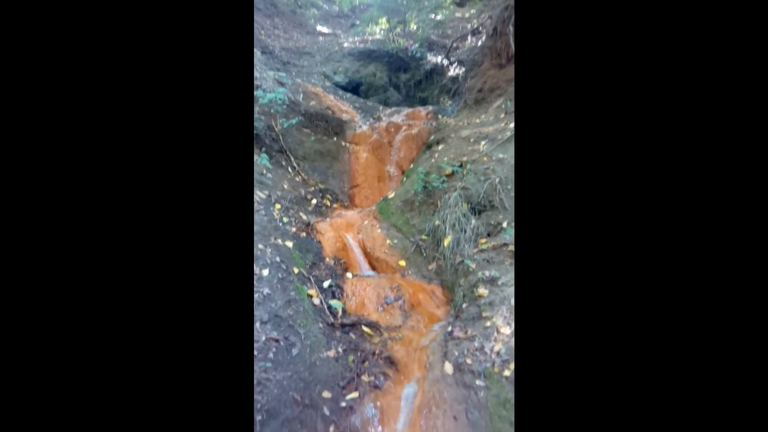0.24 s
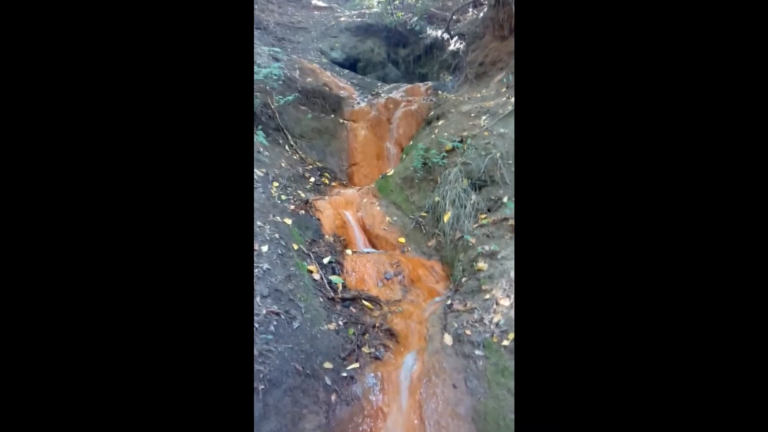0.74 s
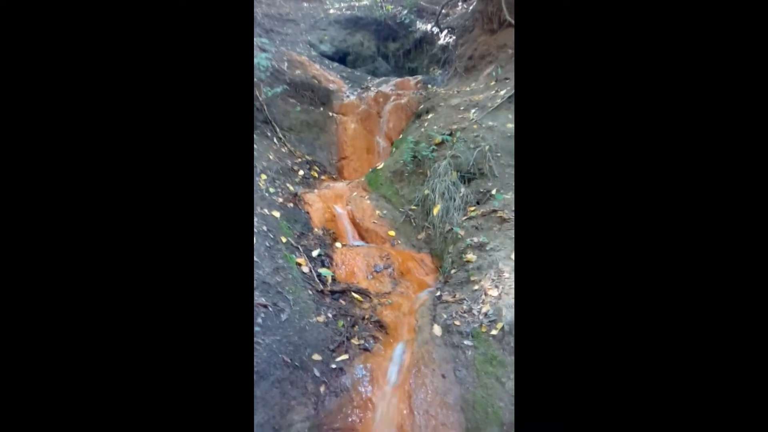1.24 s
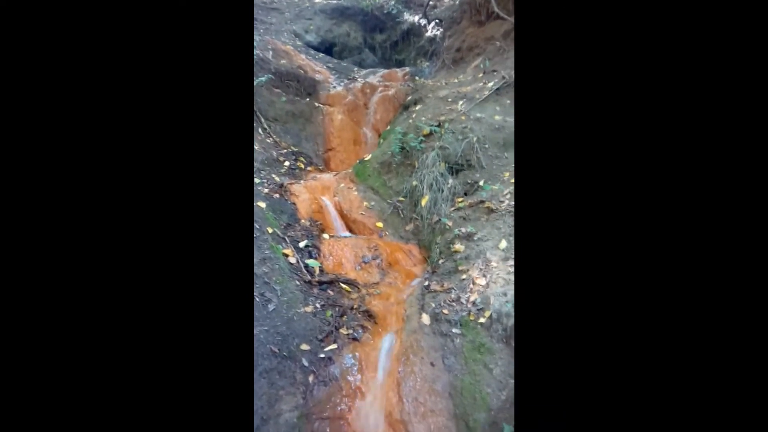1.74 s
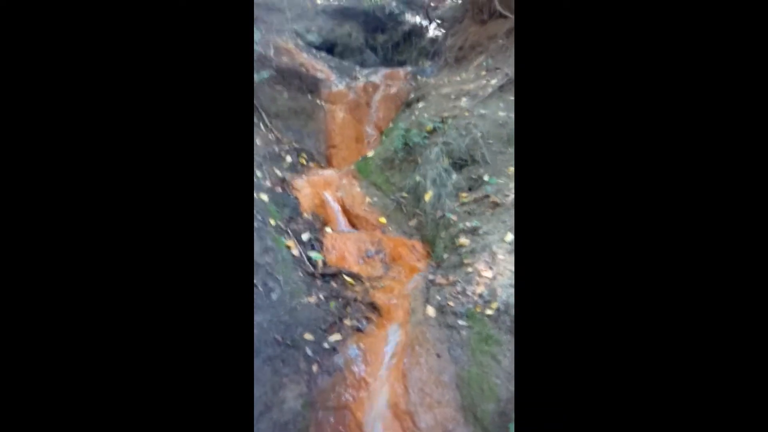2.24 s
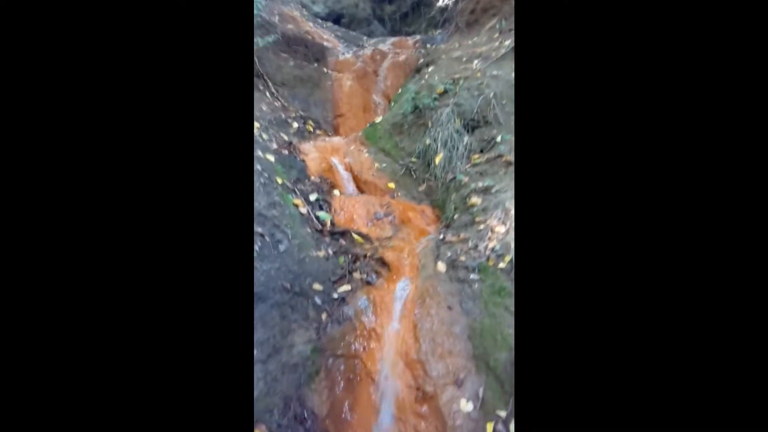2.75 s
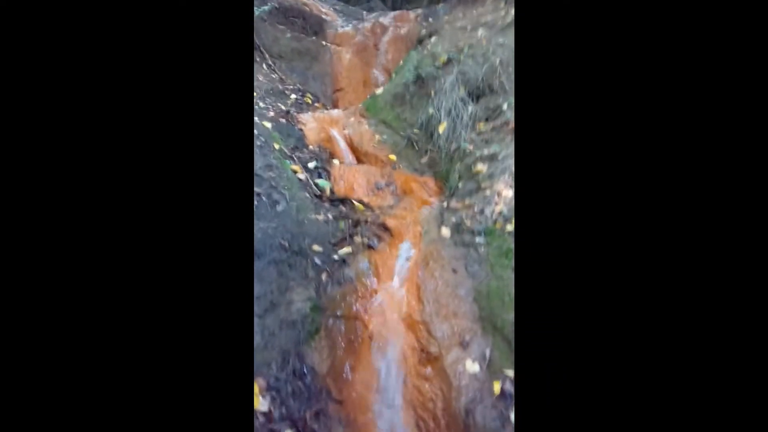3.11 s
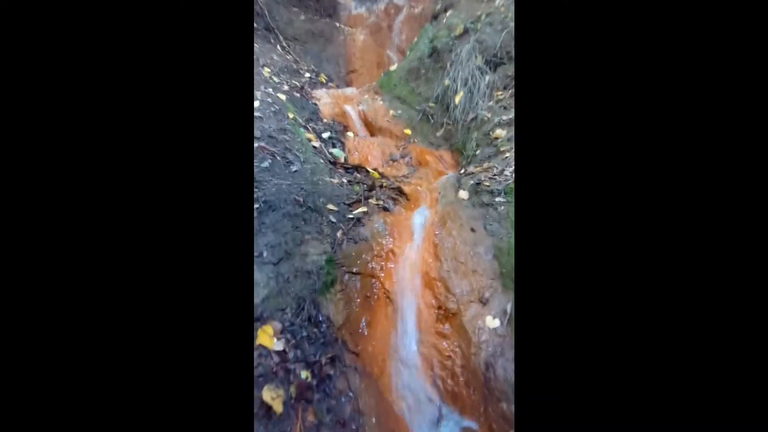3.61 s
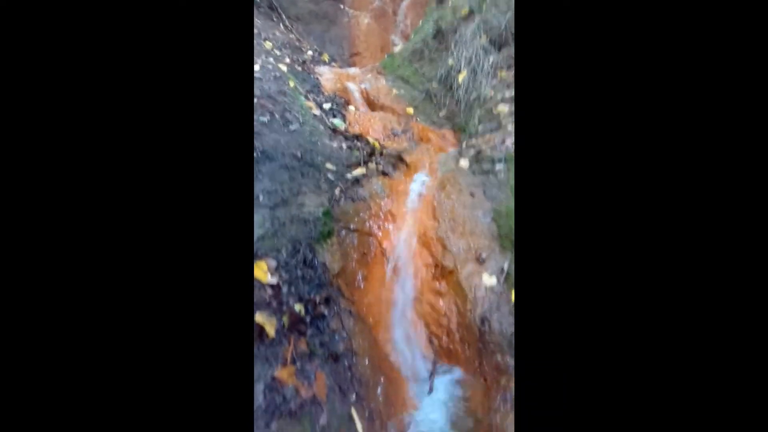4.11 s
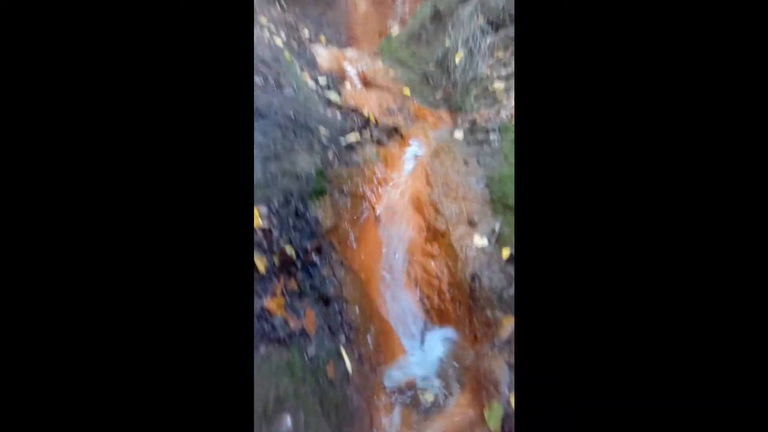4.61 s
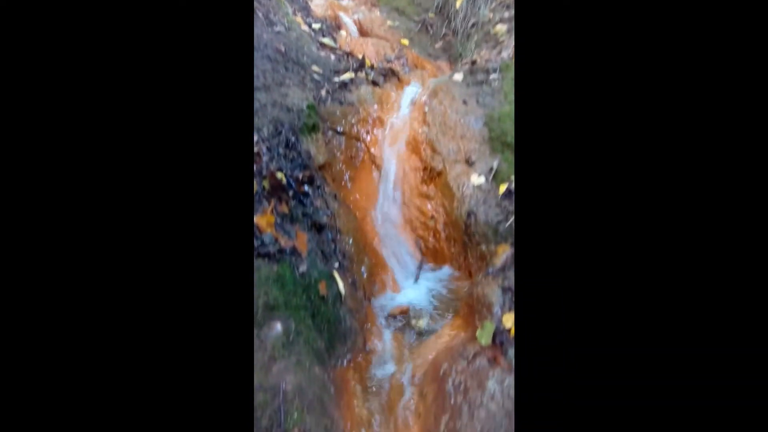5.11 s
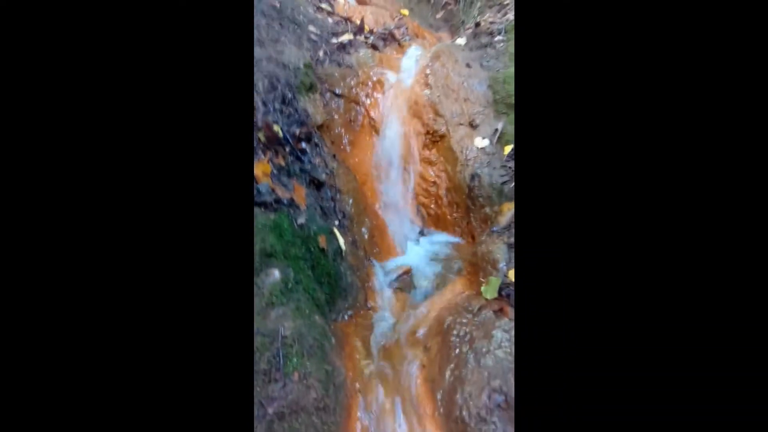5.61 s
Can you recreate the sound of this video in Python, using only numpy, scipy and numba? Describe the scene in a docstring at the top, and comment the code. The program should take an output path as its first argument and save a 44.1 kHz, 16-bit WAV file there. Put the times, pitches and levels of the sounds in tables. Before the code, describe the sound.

Steady outdoor rush of shallow running water, tinkling and fizzing at first, turning louder with bubbling gurgles and sharp drips on stone.

```python
"""Spring water runs down a narrow rocky channel, heard in mono from a microphone carried slowly towards it.
Swarms of bubbles, each a short dying sine, make everything from deep gulps to fine tinkling and fizz.
Rivulets trill with like-sized bubbles; drops slap and tick as bursts of noise and clicks on the stone.
Filters colour the water like hollows in the rock, and the earth banks add a short tail of echoes.
About three seconds in, the lower chute and its plunge pool come close and the gurgling grows."""
import sys
import numpy as np
from scipy import signal
from scipy.fft import rfft, irfft
from scipy.io import wavfile
from scipy.ndimage import uniform_filter1d, map_coordinates
from numba import njit

SR = 44100
rng = np.random.default_rng(int(sys.argv[2]) if len(sys.argv) > 2 else 0)


def file_out(sig):
    """Save sig as 16-bit WAV at sys.argv[1]."""
    # one column per channel
    cols = np.atleast_2d(sig).T
    # limit, then scale
    lim = np.clip(cols, -1, 1)
    pcm = np.round(lim * 32767).astype(np.int16)
    wavfile.write(sys.argv[1], SR, pcm)


N = 258426
TIME = np.arange(N) / SR  # s
BLOOM = 0.012  # swelling time constant of a bubble, as a share of its ring time
REF_HZ, DAMPING = 1000, 0.63  # lone and rivulet bubbles: ring time falls as this power of pitch / REF_HZ


@njit
def ring(start, hz, size, t60, rise, bloom):
    """Each bubble is a sine that swells as it pinches off, then dies while its pitch climbs towards the surface."""
    out = np.zeros(N)
    for k in range(len(start)):
        first = int(start[k] * SR)
        length = t60[k] * SR
        phase = 0.
        gain = size[k] * (1 + 10 * bloom)  # a little extra height for the slow start
        fall = np.exp(-np.log(1000.) / length)  # 60 dB over the ring time
        neck = 1.
        pinch = np.exp(-1 / (bloom * length))
        for i in range(max(first, 0), min(first + int(length), N)):
            climb = 1 + rise[k] * (i - first) / length
            phase += 2 * np.pi * hz[k] * climb / SR
            gain *= fall
            neck *= pinch
            out[i] += gain * (1 - neck) * np.sin(phase)
    return out


def bubbles(per_s, lo_hz, hi_hz, cycles, spread_db, rise, drift=None):
    """A swarm of bubbles of mixed radius, rms 1: small ones ring high, and a positive spread makes few strong."""
    when, radius, force, damping, depth = rng.random((int(per_s * N / SR), 5)).T
    hz = lo_hz * (hi_hz / lo_hz) ** radius
    if drift is not None:
        hz = hz * drift[(when * N).astype(int)]
    strength_db = -spread_db * np.log(force + .01)
    # small bubbles die sooner, so they need more height for the same power per Hz
    size = undb(strength_db) * hz
    t60 = cycles * 2 ** (2 * damping - 1) / hz  # from half to twice the given cycles
    swarm = ring(when * N / SR, hz, size, t60, 2 * rise * depth, BLOOM)
    return swarm / swarm.std()


def impacts(per_s, spread_db):
    """Droplets hit stone, one click each; rms 1."""
    when, force = rng.random((int(per_s * N / SR), 2)).T
    strength_db = -spread_db * np.log(force + .01)
    signs = (-1) ** np.arange(len(when))
    clicks = np.bincount((when * N).astype(int), undb(strength_db) * signs, N)
    return clicks / clicks.std()


def water(ringing, drops_per_s, lo_hz, hi_hz, splash_db):
    """Bubbles and the fainter clicks of their drops come in splashes and ring the rock; slow level at rms 1."""
    grains = ringing + undb(-12) * impacts(drops_per_s, spread_db=4.0)
    return steady(band(channel(grains * undb(splash_db)), lo_hz, hi_hz, order=3))


def gulps(surge):
    """Big pockets of air are dragged under in the pool, with the soft thud of falling water."""
    ringing = bubbles(per_s=260, lo_hz=183, hi_hz=583, cycles=14.2, spread_db=2.0, rise=0.18)
    splash_db = 0.53 * surge + 1.3 * walk(20)
    return water(ringing, drops_per_s=830, lo_hz=27, hi_hz=710, splash_db=splash_db)


def gurgle(surge):
    """Pea-sized bubbles churn at the foot of the chute."""
    ringing = bubbles(per_s=280, lo_hz=594.4, hi_hz=1118.5, cycles=46, spread_db=0.8, rise=0.11)
    splash_db = 1.0 * surge + 1.0 * walk(35)
    return water(ringing, drops_per_s=1000, lo_hz=480, hi_hz=1250, splash_db=splash_db)


def burble(surge):
    """The chute folds air into a dense, steady run of bubbles."""
    ringing = bubbles(per_s=800, lo_hz=1114, hi_hz=1621, cycles=38, spread_db=2.0, rise=0.05)
    splash_db = 0.54 * surge + 0.59 * walk(45)
    return water(ringing, drops_per_s=1900, lo_hz=995, hi_hz=1720, splash_db=splash_db)


def babble(surge):
    """Smaller bubbles form where the stream folds over the steps; one ledge sheds bubbles of like size."""
    ringing = bubbles(per_s=650, lo_hz=1649, hi_hz=3044, cycles=71, spread_db=1.5, rise=0.068)
    ledge_drift = np.exp(0.04 * walk(4))
    ledge = bubbles(per_s=400, lo_hz=1816, hi_hz=2100, cycles=24, spread_db=-2.0, rise=0.04, drift=ledge_drift)
    ledge_db = -6.5 + 4.3 * walk(16)
    splash_db = 0.67 * surge + 1.07 * walk(45)
    return water(ringing + undb(ledge_db) * ledge, drops_per_s=2000, lo_hz=1350, hi_hz=2920, splash_db=splash_db)


# A thin jet sheds bubbles of nearly one size, drifting with the flow; only pitch relative to its mean is used:
# (time [s], pitch [Hz])
JET_PITCH = [(0, 4260), (.8, 4040), (1.05, 4400), (1.5, 3920), (2.1, 4260), (3.05, 4320), (3.4, 4780),
             (3.8, 4090), (5.86, 4410)]


def tinkle(surge):
    """Drops trap tiny bubbles in the thin film on the rock; some bead into clear notes, and a jet sings in spurts."""
    ringing = bubbles(per_s=1700, lo_hz=2986, hi_hz=6195, cycles=98, spread_db=2.5, rise=0.026)
    jet_hz = np.interp(TIME, *np.transpose(JET_PITCH)) * np.exp(0.011 * walk(6))
    jet_drift = jet_hz / jet_hz.mean()
    jet = bubbles(per_s=500, lo_hz=4100, hi_hz=4490, cycles=78, spread_db=0.5, rise=0.012, drift=jet_drift)
    jet_db = np.interp(place(), [0, 2], [-8, -10]) + 2.2 * walk(22)
    beads = bubbles(per_s=130, lo_hz=2912, hi_hz=5683, cycles=140, spread_db=1.5, rise=0.014)
    grains = ringing + undb(-5.5) * beads + undb(jet_db) * jet
    splash_db = 0.75 * surge + 0.5 * walk(40)
    return water(grains, drops_per_s=2700, lo_hz=2180, hi_hz=7500, splash_db=splash_db)


def spray(surge):
    """Fine droplets patter and foam fizzes over the smooth hiss of water further off."""
    fizz = undb(-2.0) * bubbles(per_s=2400, lo_hz=5860, hi_hz=14160, cycles=70, spread_db=3.5, rise=0.11)
    patter = impacts(per_s=6000, spread_db=1.0)
    hiss = undb(-1) * rng.standard_normal(N)
    splash_db = 2.4 * surge + 0.47 * walk(34)
    mist = channel((fizz + patter) * undb(splash_db) + hiss)
    return steady(band(mist, 6000, 20000, order=3))


# Rivulets that shed a trill of like-sized bubbles, level before the run's swell and the final mix:
# (start [s], length [s], pitch [Hz], level [dB])
RIVULET_RUNS = [(0, 0.082, 2020, -59), (0, 0.14, 4220, -54), (0.01, 0.15, 2580, -58),
                (0.19, 0.17, 4370, -48.5), (0.268, 0.14, 5680, -52.5), (0.34, 0.11, 1890, -51),
                (0.341, 0.15, 4000, -48.5), (0.645, 0.1, 3340, -49), (0.664, 0.15, 2670, -54),
                (0.702, 0.12, 4610, -52), (0.881, 0.09, 4000, -48.5), (0.881, 0.093, 4630, -51),
                (1.0, 0.19, 4410, -50), (1.139, 0.093, 4620, -52), (1.25, 0.13, 3850, -51.5),
                (1.309, 0.089, 3040, -53), (1.379, 0.1, 1440, -56), (1.412, 0.049, 4650, -46.5),
                (1.44, 0.32, 3780, -50.5), (1.65, 0.22, 4460, -56), (1.783, 0.12, 2910, -55),
                (1.8, 0.38, 3180, -55.5), (1.799, 0.25, 3800, -52), (1.872, 0.12, 4440, -50.5),
                (2.247, 0.17, 4350, -52), (2.698, 0.14, 4050, -50), (2.87, 0.42, 4350, -47.5),
                (2.97, 0.12, 3060, -54), (3.04, 0.46, 5480, -53), (3.1, 0.72, 1350, -49.5),
                (3.22, 0.035, 4650, -42), (3.199, 0.17, 2780, -49), (3.294, 0.24, 4300, -49.5),
                (3.393, 0.14, 4760, -47), (3.49, 0.11, 2130, -51), (3.549, 0.16, 4000, -49),
                (3.706, 0.22, 3380, -48.5), (3.786, 0.31, 4400, -50), (3.799, 0.34, 1220, -52),
                (3.822, 0.15, 5300, -45), (3.6, 0.65, 921, -52), (3.878, 0.52, 2100, -53.5),
                (4.021, 0.6, 5400, -55), (4.347, 0.19, 4710, -49), (4.41, 0.25, 860, -52.5),
                (4.52, 0.11, 4260, -47), (4.753, 0.037, 2630, -49), (4.759, 0.082, 3660, -49),
                (4.761, 0.11, 970, -48.5), (4.802, 0.12, 1700, -52), (5.021, 0.13, 2110, -53),
                (5.339, 0.23, 840, -50), (5.57, 0.23, 890, -51.5), (5.632, 0.14, 5620, -53),
                (5.693, 0.18, 2350, -47.5)]


def runs(per_s=180, scatter_hz=42, scatter_db=2.5, t60_s=0.048, rise=0.02):
    """A rivulet sheds like-sized bubbles at a loose pace; small ones come faster, die sooner; runs swell and ebb."""
    start, length, pitch, db = np.array(RIVULET_RUNS, float).T
    small = pitch / REF_HZ
    rate = per_s * small ** 0.15
    t60 = t60_s * small ** -DAMPING
    # overlapping dying sines add in power, so the height is divided by their summed rms
    height = undb(db) / np.sqrt(rate * t60 / np.log(1000) / 2 / 2)
    out = np.zeros(N)
    for k in range(len(start)):
        late, detune, force = rng.standard_normal((N // 500, 3)).T
        along = (np.arange(len(late)) + late / 2) / (rate[k] * length[k])  # 0 start of the run, 1 end
        inside = (along > 0) & (along < 1)
        along, detune, force = along[inside], detune[inside], force[inside]
        swell = np.sqrt(np.sin(np.pi * along))
        size = height[k] * swell * undb(scatter_db * np.minimum(force, 2))
        when = start[k] + length[k] * along
        hz = pitch[k] + scatter_hz * detune
        alike = np.ones(len(along))
        out += ring(when, hz, size, t60[k] * alike, rise * alike, BLOOM)
    return band(out, 540, 7200, order=3)


# Lone bubbles that ring out above the rush, level before filtering and the final mix:
# (time [s], pitch [Hz], level [dB])
LONE_BUBBLES = [(0.022, 2060, -41), (0.051, 4330, -38), (0.157, 2640, -38), (0.178, 3510, -39),
                (0.263, 4340, -33.5), (0.38, 4200, -32), (0.383, 3600, -36), (0.568, 352, -54),
                (0.731, 298, -56), (0.768, 3950, -24.5), (0.929, 4030, -38), (0.948, 2580, -33.5),
                (0.982, 1660, -40.5), (1.086, 4450, -34), (1.17, 1930, -34.5), (1.174, 2540, -35),
                (1.214, 290, -51), (1.37, 3070, -35), (1.416, 4080, -32), (1.468, 1430, -39),
                (1.5, 3840, -36), (1.568, 4700, -30.5), (1.759, 4200, -29.5), (1.838, 2900, -34.5),
                (1.84, 290, -57), (1.941, 1520, -38), (2.23, 347, -50), (2.092, 1110, -42),
                (2.248, 1940, -34.5), (2.298, 2980, -34.5), (2.431, 477, -51), (2.468, 550, -45),
                (2.524, 1330, -38), (2.601, 288, -55), (2.621, 1000, -37.5), (2.668, 2350, -37),
                (2.804, 4050, -32), (2.82, 3250, -38), (2.912, 1490, -35.5), (2.945, 1540, -32),
                (3.025, 3040, -39), (3.066, 4340, -33), (3.121, 4230, -29), (3.186, 4380, -25.5),
                (3.223, 4730, -28), (3.237, 2780, -34), (3.394, 1210, -35.5), (3.408, 290, -51),
                (3.46, 920, -34.5), (3.479, 5600, -32), (3.529, 2050, -33), (3.561, 2210, -31),
                (3.561, 1350, -33), (3.645, 368, -51), (3.697, 1434, -32), (3.829, 4500, -23.5),
                (3.835, 1195, -35), (3.926, 4060, -29), (3.989, 324, -56), (4.035, 3760, -24),
                (4.084, 285, -40), (4.087, 1184, -31), (4.282, 258, -53), (4.348, 3420, -27),
                (4.356, 2850, -30), (4.358, 4015, -30), (4.482, 4750, -31), (4.588, 812, -36),
                (4.653, 836, -37.5), (4.694, 3575, -30.5), (4.764, 2670, -32), (4.782, 2600, -33),
                (4.813, 3640, -27), (4.819, 992, -40), (4.84, 848, -38), (4.843, 1950, -33),
                (4.979, 3380, -33), (5.004, 3720, -30.5), (5.22, 945, -37), (5.226, 5500, -31.5),
                (5.266, 236, -43), (5.27, 4400, -27.5), (5.331, 700, -36.5), (5.339, 1850, -34),
                (5.37, 850, -38), (5.396, 870, -36), (5.466, 780, -40), (5.521, 1460, -36.5),
                (5.541, 3450, -29), (5.568, 4360, -29.5), (5.608, 1430, -34), (5.709, 356, -42),
                (5.743, 790, -33), (5.766, 906, -36), (5.806, 2245, -31.5), (5.839, 1770, -35)]


def plinks(rise=0.017, ref_t60_s=0.045):
    """Lone strong bubbles ring as dying sines, the small ones dying sooner."""
    start, hz, db = np.array(LONE_BUBBLES, float).T.copy()
    t60 = ref_t60_s * (REF_HZ / hz) ** DAMPING
    rings = ring(start, hz, undb(db), t60, np.full(len(hz), rise), BLOOM)
    return band(rings, 150, 9500, order=3)


# Fat drops that slap the stone, level of the noise before filtering:
# (time [s], level [dB], lower edge [Hz])
FAT_DROPS = [(0.157, -31, 5500), (0.7, -38, 2000), (0.929, -26, 4500), (1.298, -22, 5500),
             (2.093, -28, 900), (2.625, -36, 1500), (3.501, -35, 4000), (3.88, -29, 4500),
             (3.992, -30, 6500), (4.605, -31.5, 1200), (5.246, -33, 5000), (5.346, -40, 1500),
             (5.704, -36, 4000)]


def slaps(t60=0.054, attack_s=0.0028):
    """A fat drop bursts into a brief noisy shower of droplets; the thinner the film it lands on, the brighter."""
    out = np.zeros(N)
    t = TIME[:SR // 10]
    for start, db, lowest_hz in FAT_DROPS:
        first = int(start * SR)
        envelope = undb(db - 60 * t / t60) * (1 - np.exp(-t / attack_s))
        shower = envelope * rng.standard_normal(len(t))
        out[first:first + len(t)] += band(shower, lowest_hz, 13000, order=2)[:N - first]
    return channel(out)


# Single drops that tick on bare rock, level of the click before filtering: (time [s], level [dB])
ROCK_DROPS = [(0.022, -21), (0.265, -21), (0.383, -19), (0.683, -21), (0.697, -17), (0.77, -19),
              (0.908, -22), (0.931, -18.5), (1.025, -18), (1.37, -21), (1.549, -29), (1.569, -22),
              (1.786, -22), (1.84, -20), (1.942, -17), (2.096, -21), (2.625, -16), (2.848, -21),
              (2.948, -21), (3.055, -17), (3.188, -23), (3.226, -18), (3.244, -16), (3.48, -14),
              (3.546, -15), (3.704, -19), (3.749, -18), (3.88, -15), (3.927, -12), (4.007, -17),
              (4.035, -19), (4.086, -16), (4.122, -19), (4.194, -11), (4.275, -17), (4.358, -15),
              (4.582, -18), (4.642, -19), (4.814, -19), (4.98, -19), (5.006, -25), (5.228, -17),
              (5.313, -20), (5.345, -17), (5.542, -21), (5.608, -14)]


def ticks(rebound_db=-17, t60=0.014):
    """A drop cracks on the rock in one sharp click; a few fragments patter down after it."""
    out = np.zeros(N)
    t = TIME[:SR // 40]
    for start, db in ROCK_DROPS:
        fragments = undb(rebound_db - 60 * t / t60) * rng.standard_normal(len(t))
        fragments *= rng.random(len(t)) < .1  # keep about one in ten
        hit = fragments + (t == 0)
        first = int(start * SR)
        out[first:first + len(t)] += undb(db) * hit[:N - first]
    return band(channel(out), 700, 12000, order=1)


# Dull low thuds by the pool, level at the onset before the last filter: (time [s], level [dB])
POOL_THUDS = [(4.45, -71), (4.57, -60), (4.76, -63), (5.25, -59.5)]


def thuds(t60=0.18):
    """Soft, deep thumps under the gurgling: low noise that starts at once and dies away."""
    envelope = np.zeros(N)
    for at, db in POOL_THUDS:
        since = np.maximum(TIME - at, 0)
        envelope += undb(db - 60 * since / t60) * (TIME > at)
    rumble = steady(band(rng.standard_normal(N), 28, 150, order=1))
    return band(envelope * rumble, 22, 240, order=2)


def air(db=-89):
    """Faint low rumble of the open air, made of low-passed noise held at a steady level."""
    rumble = band(rng.standard_normal(N), 5.8, 69, order=2)
    return undb(db) * steady(rumble, span_s=0.62)


# Path of the microphone along the stream: (time [s], place [0 upper steps, 1 chute, 2 pool])
MICROPHONE_PATH = [(0, 0.037), (2.3, 0.066), (2.78, 0.24), (3.25, 0.81), (3.55, 1.08), (4.0, 1.32),
                   (4.55, 1.61), (5.15, 1.92), (5.86, 1.78)]


def place():
    """Where the microphone is: 0 upper steps, 1 chute, 2 pool."""
    return np.clip(np.interp(TIME, *np.transpose(MICROPHONE_PATH)), 0, 2)


# Broad colour of the splashing: (frequency [Hz], level [dB per Hz])
SPLASH_COLOUR = [(25, -21), (60, -29), (100, -16), (160, -10), (235, -5), (330, -2.5), (470, -7),
                 (600, -10.5), (760, -10), (3000, 0), (4600, -2.5), (5100, -0.5), (11500, -27),
                 (16000, -28)]


def resonate(x, hollows, size=2048):
    """Rock hollows boost or weaken their own pitches, on top of the broad colour; the filter never rings early."""
    hz = np.maximum(np.fft.rfftfreq(size, 1 / SR), 1)
    points_hz, points_db = np.transpose(SPLASH_COLOUR)
    db = np.interp(np.log(hz), np.log(points_hz), points_db)
    for centre, width, peak in hollows:
        db = db + peak / (1 + (2 * (hz - centre) / width) ** 2)
    # folding the cepstrum turns the level curve into a minimum-phase filter
    cepstrum = irfft(np.log(undb(db)))
    cepstrum[1:size // 2] *= 2
    cepstrum[size // 2 + 1:] = 0
    impulse = irfft(np.exp(rfft(cepstrum)))
    return signal.oaconvolve(x, impulse)[:N]


# Hollows in the rock along the channel; a negative level is a dip: (centre [Hz], width [Hz], level [dB])
STEP_HOLLOWS = [(120, 100, -1), (780, 260, 5.5), (1390, 270, 6), (1640, 150, 1.5), (1837, 230, 7),
                (2225, 220, -8), (2400, 470, 5), (2900, 160, -1.5), (3130, 240, 1), (3760, 210, 7.5),
                (4200, 300, 3.5), (4560, 220, 5.5), (5330, 620, -4.5), (5600, 220, 2)]
LEDGE_HOLLOWS = [(560, 470, -18), (945, 160, 5.5), (1080, 120, -5), (1330, 310, 2), (1890, 150, -8.5),
                 (2740, 150, 5.5), (3560, 150, 4), (3780, 220, -1.5), (4200, 520, 8.5), (4590, 250, 4.5),
                 (5040, 150, 0.5), (5400, 230, 3.5), (6600, 130, 5)]
CHUTE_ROCK_HOLLOWS = [(171, 78, -5), (623, 520, -6.5), (897, 240, 9), (1040, 94, -8.5), (1330, 330, 9.5),
                      (1700, 180, -3), (1930, 120, 4.5), (2220, 240, 5.5), (2600, 450, -1.5),
                      (2900, 270, -6), (3440, 290, 7.5), (4040, 120, 9), (4590, 190, 7.5), (5160, 250, -5),
                      (5460, 230, 7.5), (5520, 180, -5)]
POOL_ROCK_HOLLOWS = [(104, 140, 9), (603, 190, -13), (848, 400, 12), (1360, 180, 0), (1620, 160, 0),
                     (1840, 300, 10.5), (2550, 750, 9.5), (2860, 250, 2), (3660, 320, 2), (4500, 520, 5.5),
                     (4930, 220, -4), (5600, 260, 1.5)]
# Where the upper steps, the lip, the chute and the pool are nearest: (place [0 to 2])
NEAREST_PLACES = (0, 0.87, 1.23, 2)


def channel(x):
    """The microphone passes from the hollows of the upper steps over the lip and the chute to the pool."""
    here = place()
    stretches = (STEP_HOLLOWS, LEDGE_HOLLOWS, CHUTE_ROCK_HOLLOWS, POOL_ROCK_HOLLOWS)
    out = np.zeros(N)
    for nearest, hollows in zip(np.eye(len(stretches)), stretches):
        share = np.interp(here, NEAREST_PLACES, nearest)
        out += resonate(x * np.sqrt(share), hollows)
    return out


def waver(x, rate=5, detune=0.00807):
    """The moving water detunes bubbles and hollows a little, up and down, by shifting the sound in time."""
    slip = np.cumsum(detune * walk(rate))  # samples
    slip -= uniform_filter1d(slip, SR // 2)  # take out the slow drift
    return map_coordinates(x, [np.arange(N) + slip], order=3, mode="mirror")


def banks(x, wet_db=-13, t60=0.31, count=14):
    """The earth banks scatter a short tail; the sound hops between spots, each with its own paths."""
    t = TIME[:SR // 6]
    hop = SR // 200  # samples in 5 ms
    spot = rng.integers(0, count, N)[np.arange(N) // hop]
    tails = rng.standard_normal((count, len(t))) * undb(-60 * t / t60) * (t > .002)
    wet = np.zeros(N)
    for k, tail in enumerate(tails):
        share = uniform_filter1d(1. * (spot == k), hop)
        wet += signal.oaconvolve(x * share, tail / np.linalg.norm(tail))[:N]
    return x + undb(wet_db) * wet


def undb(db):
    """Decibels to gain."""
    return 10 ** (np.asarray(db) / 20)


def walk(rate):
    """Random levels, a new one every 1 / rate s, joined by smooth slides; spread 1."""
    hold = max(int(SR / rate), 1)
    steps = rng.standard_normal(N // 20)[(TIME * rate).astype(int) % (N // 20)]
    slewed = uniform_filter1d(steps, hold)
    return slewed / slewed.std()


def steady(x, span_s=0.15):
    """Bring the slow level to rms 1 and keep the quick flicker."""
    return x / np.sqrt(uniform_filter1d(x * x, int(span_s * SR)) + 1e-18)


def band(x, lo_hz, hi_hz, order=4):
    """Keep the pitches between two edges (Butterworth band-pass)."""
    edges_hz = [lo_hz, min(hi_hz, SR / 2 - 100)]
    return signal.sosfilt(signal.butter(order, edges_hz, "band", fs=SR, output="sos"), x)


def swells(events, attack_s, release_s):
    """Each event bends the level up or down and lets it return; one curve for each level column."""
    at, *columns = np.transpose(events)
    coarse = TIME[::64]
    since = coarse - at[:, None]
    shapes = np.exp(-(since / np.where(since < 0, attack_s, release_s)) ** 2)
    return [np.interp(TIME, coarse, db @ shapes) for db in columns]


# Level of each voice of the water along the stream, before swells and the final mix:
# (place [0 to 2], gulps [dB], gurgle [dB], burble [dB], babble [dB], tinkle [dB], spray [dB])
VOICE_LEVELS = [(0, -64.5, -62.5, -57.5, -52, -47, -54.5), (0.8, -57.5, -49.5, -47.5, -49.5, -42, -52),
                (1.15, -58.5, -51, -48.5, -45, -42.5, -51), (2, -55, -53, -55.5, -49.5, -44, -51.5)]
# Falling water drags air under and the big bubbles mostly swell: (time [s], gulps [dB], gurgle [dB])
AIR_POCKETS = [(0.17, 3, 2.5), (0.54, 9, 1.5), (0.75, 4.5, 3.5), (1.13, 4.5, 5), (1.23, 5.5, 4),
               (1.46, 5, -4), (1.59, 4.5, 3), (1.7, 6, -0.5), (1.86, 6.5, 1), (2.03, 1.5, 6), (2.09, 6, 3),
               (2.24, 7, 3), (2.4, 6, -1), (2.62, 5, 1.5), (3.08, 0, -0.5), (3.42, 1, -5), (3.52, 3.5, -3),
               (3.65, 6.5, -2), (3.81, 2.5, 1.5), (3.98, 3, 4.5), (4.09, 0, 4.5), (4.29, -0.5, -1),
               (4.45, 2.5, 4), (4.58, 2.5, 4), (4.78, 4, 1), (4.84, -2, 0), (5.02, 3, 4), (5.25, 6.5, 1),
               (5.42, 2.5, 0), (5.6, 3, 2.5), (5.71, 5.5, 3)]
# Brief dips, and some lifts, of the level: (time [s], gulps [dB], gurgle [dB], finer bubbles and spray [dB])
FLOW_CHANGES = [(0.31, -3, -0.5, 1.5), (0.66, 0, -2, 1.5), (0.85, 5, 2, -1.5), (1.02, 1, -3, 1),
                (1.34, -1, -4, 0), (1.72, 0.5, -4, -1), (1.97, -2, 1, -1), (2.15, -6, -3, 1),
                (2.52, 0, 4, 0.5), (2.73, 2, 0.5, -1.5), (2.9, 0.5, -7, 0), (3.22, -10, -7, 0),
                (3.6, -2, 0, -3), (3.94, -5, -4, 0.5), (4.16, -5, 2, 0), (4.38, -10, -6, -1.5),
                (4.71, -11, 5, -0.5), (4.94, 0, -3, 0.5), (5.12, 1, -6, -1), (5.31, -8, -1, 1),
                (5.42, -0.5, -2, -1.5), (5.5, 0.5, 0.5, -0.5)]
# The stream folds over a ledge and sheds middling bubbles: (time [s], swell [dB, scaled for each voice])
LEDGE_FOLDS = [(0.47, 4.5), (0.68, 1), (0.95, 1.5), (1.45, 3.5), (1.82, 3.5), (1.94, 6.5), (2.22, 4),
               (2.54, 5.5), (2.64, 5), (2.94, 2), (3.36, 2.5), (3.54, 1.5), (4.0, 0.5), (4.45, 2.5),
               (4.68, 1.5), (4.84, 2), (5.53, 1.5), (5.61, 1.5), (5.78, 6.5), (5.85, 5.5)]
# A splash throws drops over the rock: (time [s], swell [dB, scaled for each voice])
DROP_SPLASHES = [(0.3, -0.5), (0.39, 0.5), (0.7, 0.5), (0.77, 1.2), (0.92, 2), (2.37, 1), (3.235, 1),
                 (3.46, -0.2), (3.87, 0), (4.36, 1.7), (5.25, 1), (5.33, 0.8), (5.58, 1.1)]


def scene():
    """Nearness sets each voice's level; events move their own bubble sizes; all voices share the quick surges."""
    here = place()
    places, *levels = np.transpose(VOICE_LEVELS)
    voice_levels = (np.interp(here, places, db) for db in levels)
    gulp_db, gurgle_db, burble_db, babble_db, tinkle_db, spray_db = voice_levels
    gulp_swell, gurgle_swell = swells(AIR_POCKETS, attack_s=0.041, release_s=0.049)
    gulp_change, gurgle_change, fine_change = swells(FLOW_CHANGES, attack_s=0.039, release_s=0.033)
    fold, = swells(LEDGE_FOLDS, attack_s=0.036, release_s=0.02)
    splash, = swells(DROP_SPLASHES, attack_s=0.031, release_s=0.038)
    surge = 0.28 * walk(30) + 0.75 * walk(150)
    churn = walk(20)

    pool = undb(gulp_db + gulp_swell + gulp_change + 0.5 * churn) * gulps(surge)
    pool += undb(gurgle_db + gurgle_swell + gurgle_change + 0.33 * churn) * gurgle(surge)
    chute = undb(burble_db + 1.72 * fold + 0.5 * churn) * burble(surge)
    chute += undb(babble_db + 0.46 * fold + 1.4 * splash) * babble(surge)
    drops = undb(tinkle_db + 2.4 * splash) * tinkle(surge)
    drops += undb(spray_db + 0.51 * splash) * spray(surge)

    rush = waver(pool + undb(fine_change) * (chute + drops))
    stream = banks(rush + runs() + plinks() + ticks() + slaps())
    mono = undb(-0.55) * stream + thuds() + air()
    return np.array([mono, mono])


def record(dry):
    """A steep low-pass removes the very top of the treble."""
    low_pass = signal.ellip(10, .1, 70, 15550, fs=SR, output="sos")  # ripple dB, stop dB, edge Hz
    return signal.sosfilt(low_pass, dry)


dry = scene()
out = record(dry)
file_out(out)
```